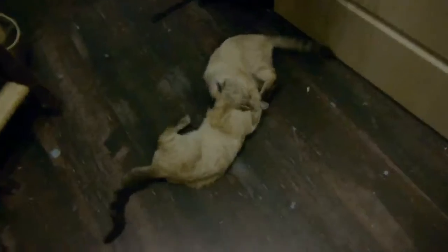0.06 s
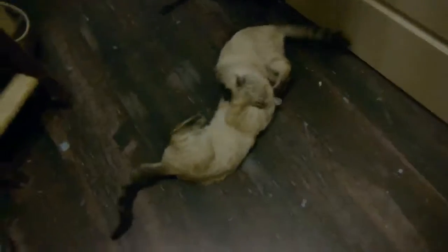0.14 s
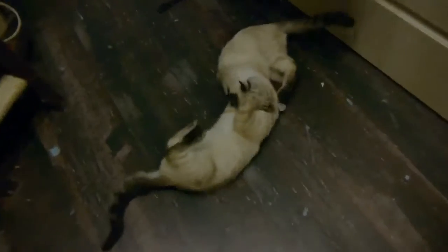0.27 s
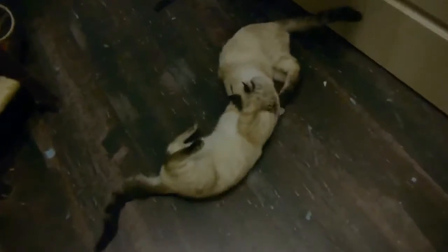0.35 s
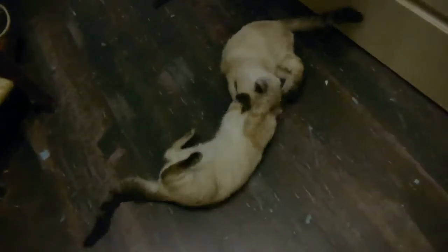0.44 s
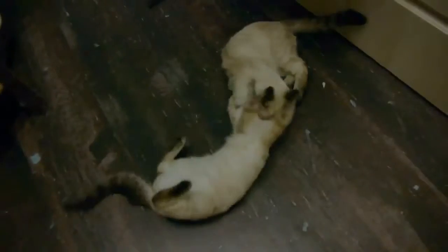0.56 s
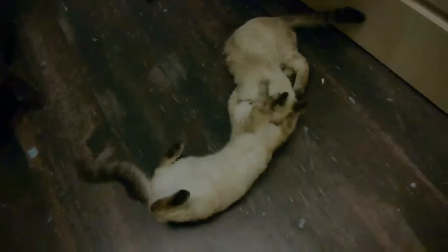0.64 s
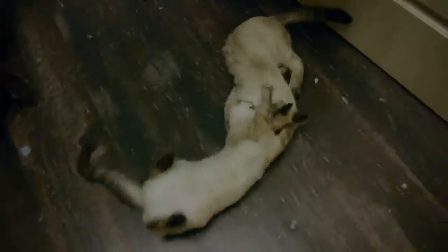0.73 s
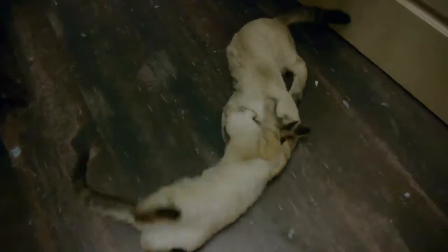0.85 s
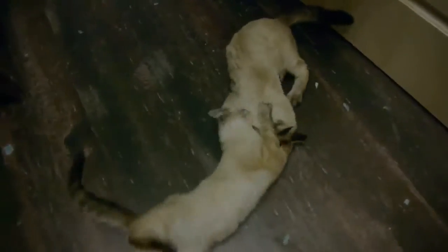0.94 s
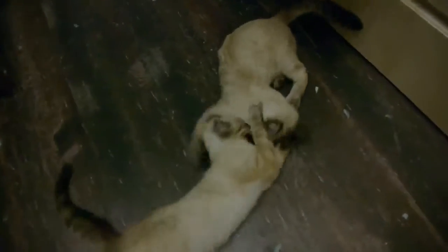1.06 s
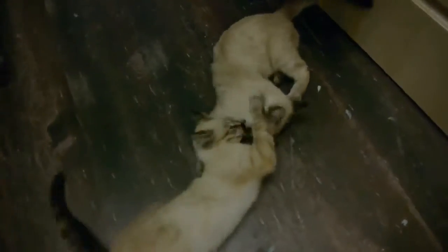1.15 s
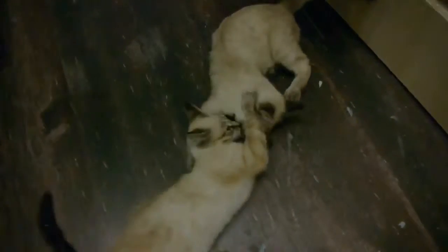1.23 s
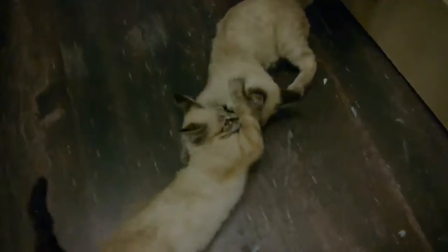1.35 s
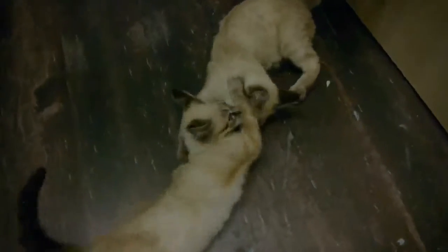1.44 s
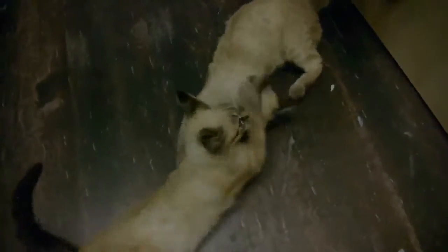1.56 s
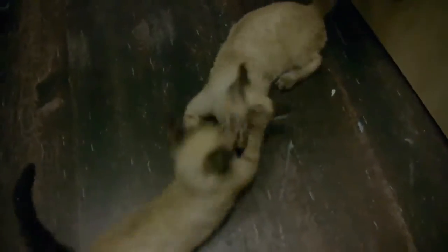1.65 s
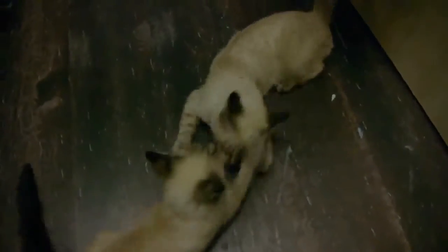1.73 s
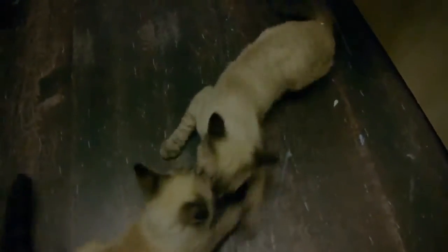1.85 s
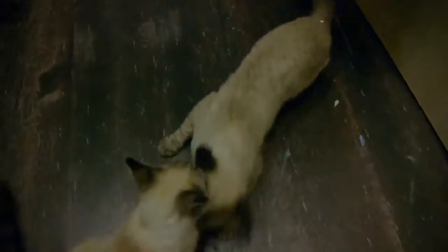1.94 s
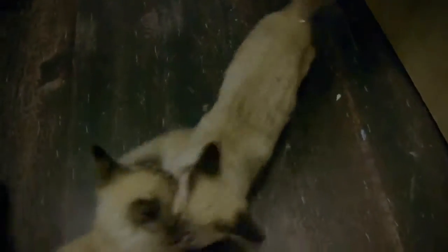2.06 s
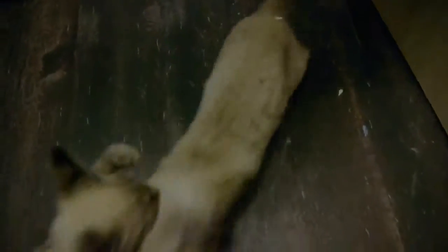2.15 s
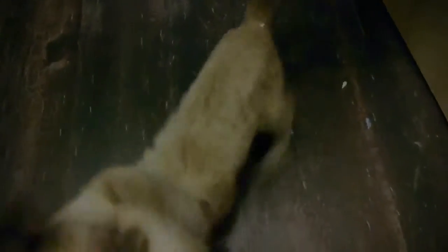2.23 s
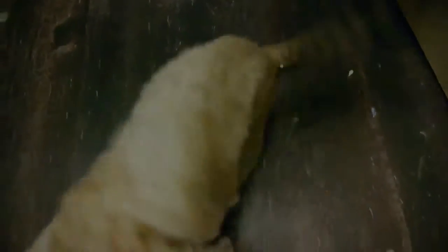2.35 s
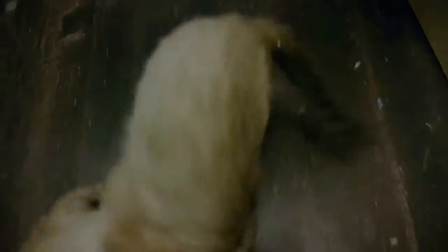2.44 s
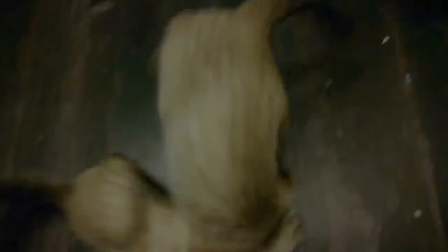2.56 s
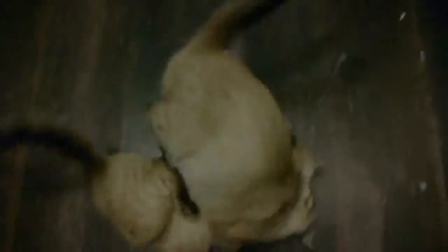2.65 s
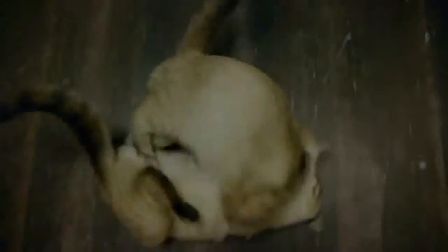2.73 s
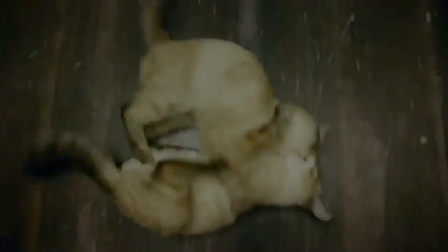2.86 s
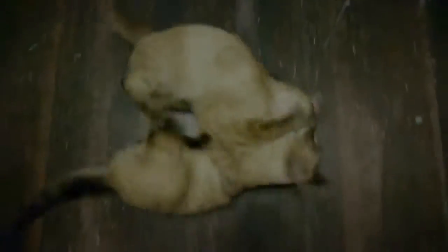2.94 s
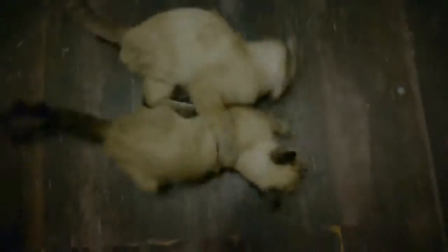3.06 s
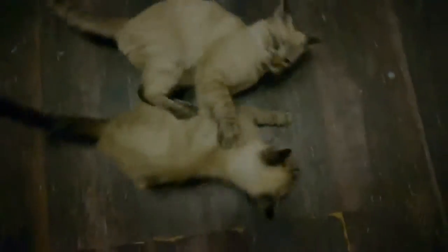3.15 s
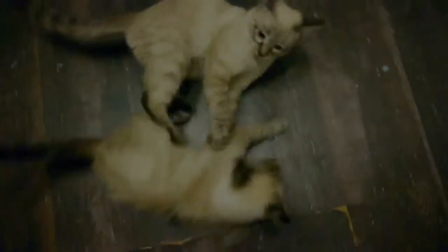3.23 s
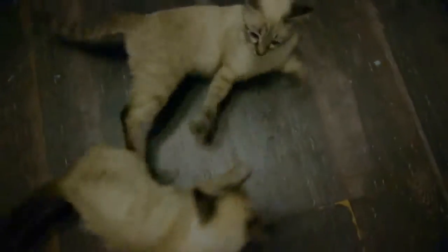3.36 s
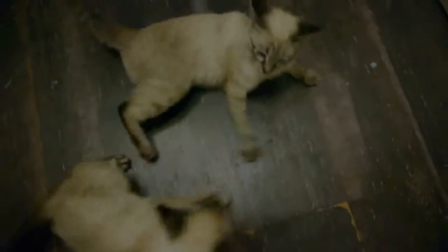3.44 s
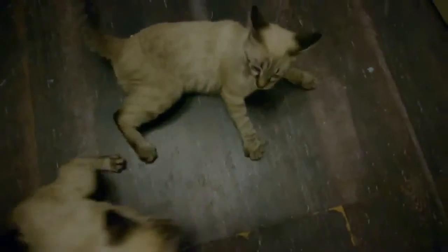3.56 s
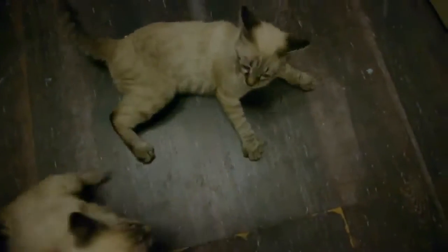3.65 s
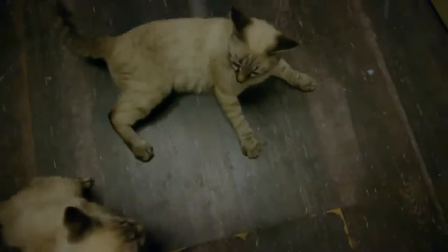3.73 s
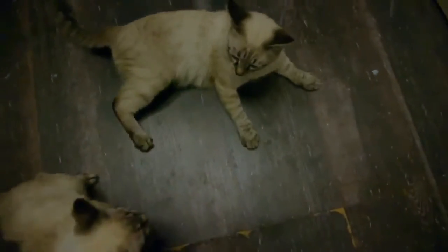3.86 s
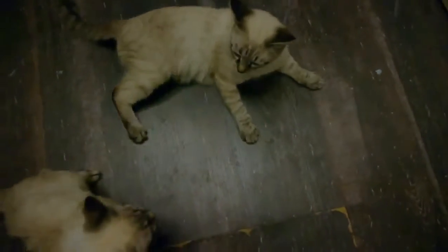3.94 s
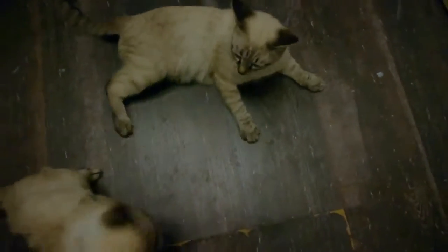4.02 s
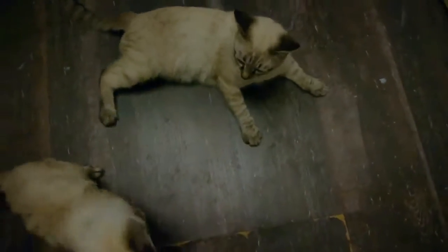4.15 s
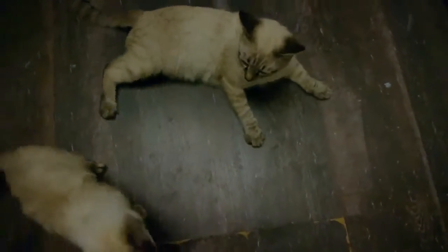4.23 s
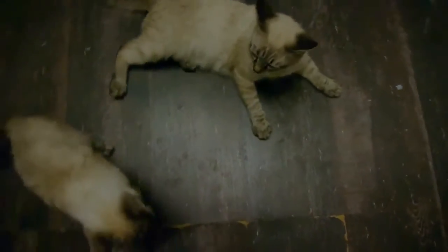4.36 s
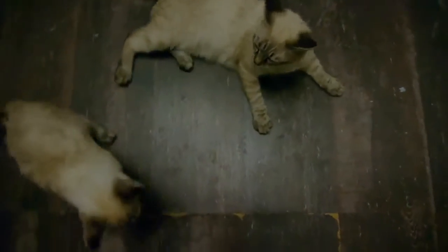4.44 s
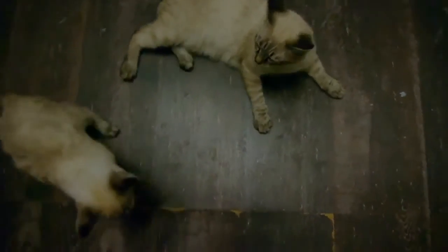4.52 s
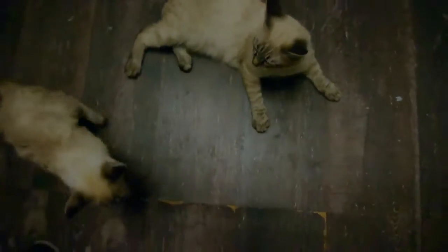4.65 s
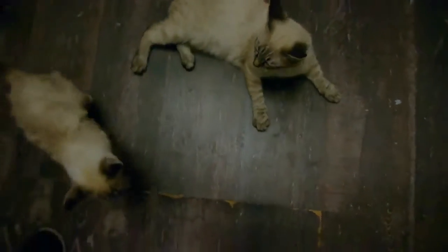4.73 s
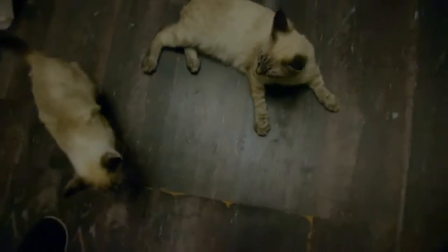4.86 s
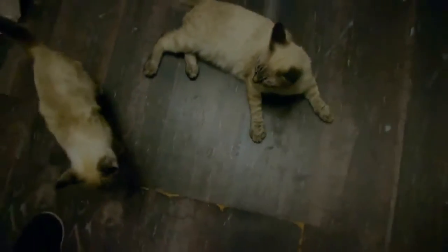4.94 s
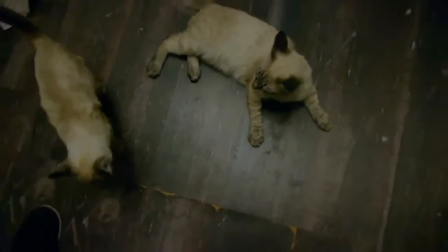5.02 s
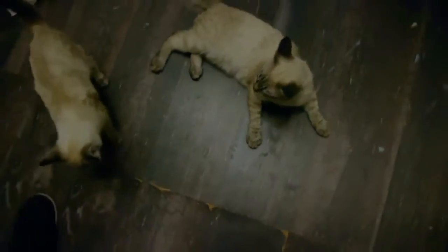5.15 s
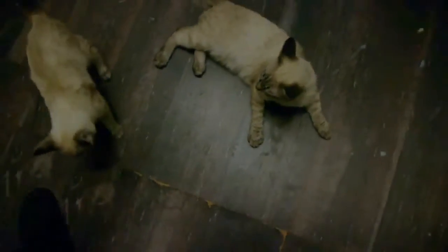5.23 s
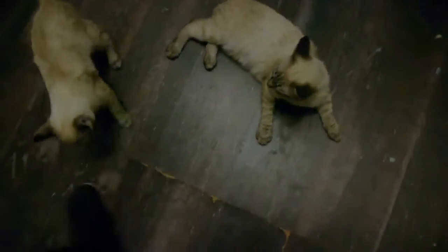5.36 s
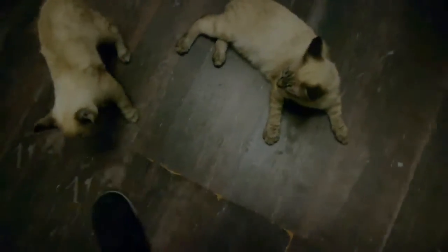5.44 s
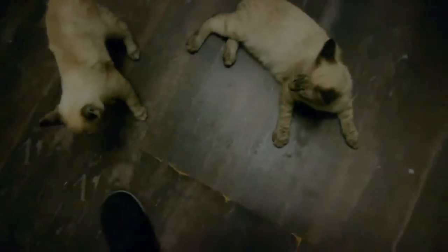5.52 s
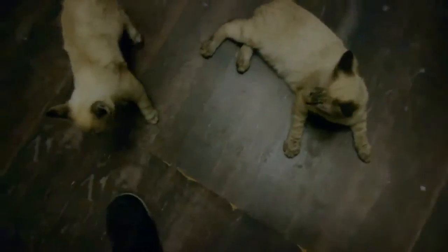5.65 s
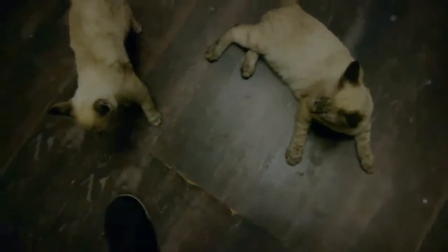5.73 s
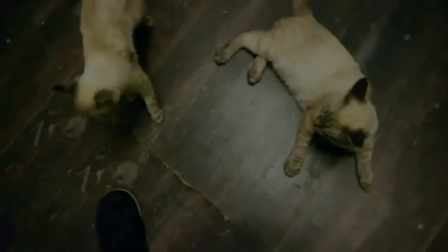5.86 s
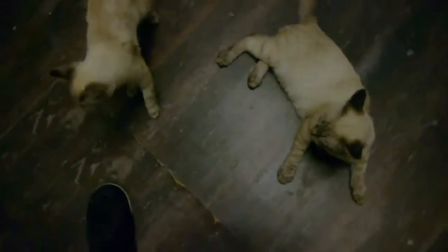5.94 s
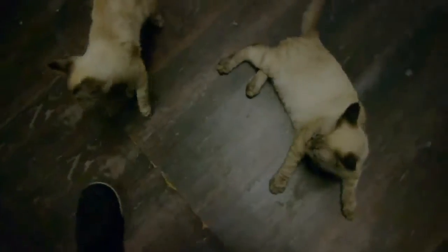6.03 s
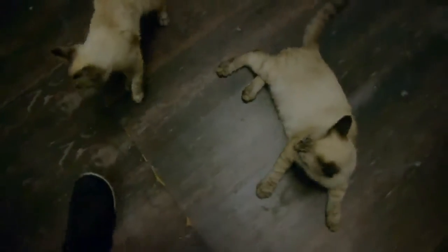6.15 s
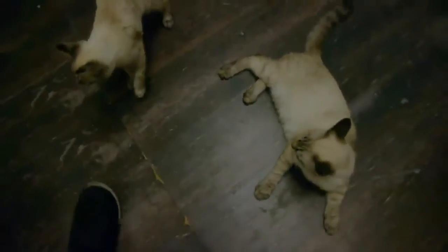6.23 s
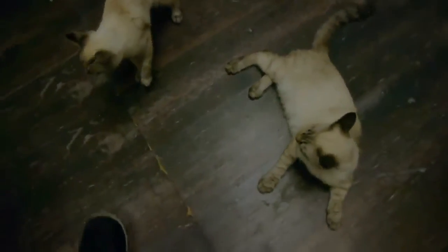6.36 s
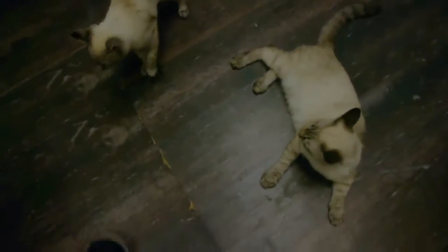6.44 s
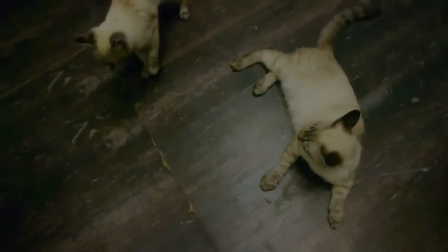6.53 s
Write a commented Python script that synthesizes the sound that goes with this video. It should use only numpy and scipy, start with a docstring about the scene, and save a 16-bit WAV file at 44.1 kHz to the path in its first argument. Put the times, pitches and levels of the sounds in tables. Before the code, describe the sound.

Two cats scuffle on a wooden floor: fur swishes, claws tick, bodies thump, one landing very loud, then a clunk and faint hum.

```python
"""Two cats wrestle on a wooden floor in a small room, heard from just above.
Fur: shaped noise in strokes that speed up and slow down. Bodies: soft pushes plus ringing floorboard modes.
Paw pats, claw ticks and the hard knock within some landings: short coloured pulses, smeared by skidding.
Dragging pads: brief swells of band noise. Midway an appliance, likely a fridge, clunks on; its relay snaps
and its motor hums in harmonics. Behind it all: quiet shaped-noise room tone."""
import sys
import numpy as np
from scipy import signal
from scipy.fft import rfft, irfft
from scipy.io import wavfile
from scipy.ndimage import uniform_filter1d

SR = 44100
rng = np.random.default_rng(int(sys.argv[2]) if len(sys.argv) > 2 else 0)


def log_audio(samples):
    """Write samples as a 16-bit WAV file to the path given in sys.argv[1]."""
    # one column per channel
    frames = np.atleast_2d(samples).T
    # limit to full scale, then quantise
    limited = np.clip(frames, -1, 1)
    pcm = np.round(limited * 32767).astype(np.int16)
    wavfile.write(sys.argv[1], SR, pcm)


N = 290619

# Room tone spectrum: (frequency [Hz], relative density [dB])
AIR_SPECTRUM = [(20, -28), (45, -10), (90, -4), (180, -1), (320, 0), (550, -5.5), (1000, -8.5), (1600, -15),
                (2700, -20), (4500, -20), (9000, -24), (15000, -27.5)]
# Room decay: (frequency [Hz], t60 [s])
ROOM_T60 = [(100, 0.15), (400, 0.41), (1000, 0.33), (4000, 0.32), (14000, 0.27)]
# Left-right likeness of noise: (frequency [Hz], correlation [-1 to 1])
LIKENESS = [(100, .99), (350, 1), (700, 0.89), (1400, 0.67), (3100, 0.12), (6800, 0.11), (10000, -0.12),
            (15000, -0.45)]
# Appliance knocks and relay snaps:
# (time [s], peak level [dB], hardness [dB/octave], room [dB re knock], cabinet boom [dB])
SWITCHES = [(3.5509, -19, -3.5, 4.5, -36), (3.5599, -29.5, 2, 6.5, -52), (4.1171, -30.5, 3, 1.5, -71),
            (4.1223, -31, 4, 5, -74)]
# Knock spectrum: (frequency [Hz], relative level [dB])
SWITCH_SPECTRUM = [(40, -36), (160, -14.5), (300, 0.5), (550, -8.5), (780, -9), (1050, -16), (1600, -14.5),
                   (2700, -18), (4200, -17.5), (8000, -32), (12000, -36), (15000, -46)]
# Motor hum course: (time [s], level [dB])
MOTOR_LEVEL = [(3.6, -54.5), (3.95, -48.5), (4.5, -53.5), (5.2, -55.5), (6.59, -58.5)]
# Hum harmonics: (multiple of HUM_HZ [1], relative level [dB])
HUM_HARMONICS = [(1, 0.5), (2, -13.5), (3, -8.5), (6, -15.5)]
# Pads sticking and slipping:
# (middle [s], peak level [dB], pitch [Hz], width [Hz], swell half-length to 1/e [s])
SQUEAKS = [(0.768, -41.5, 950, 200, 0.0056), (0.766, -44.5, 4480, 500, .005),
           (1.035, -31.5, 3420, 1730, 0.045), (1.046, -29.5, 3910, 320, 0.012),
           (1.72, -44, 3440, 1600, 0.018), (3.479, -39.5, 3400, 2000, 0.037),
           (6.034, -52.5, 1540, 400, 0.044), (6.521, -48.5, 1370, 180, 0.11)]
# Claw ticks: (time [s], peak level before claw_db [dB], left over right [dB])
CLAWS = [(0.067, -43, 2), (.164, -43, 6), (0.486, -41.5, 5), (0.764, -40, 1), (2.394, -46, 3),
         (2.4616, -35, -2), (3.7642, -50.5, -5), (4.797, -53, 0), (4.97, -54, -1), (5.87, -39.5, 3),
         (5.892, -41, 1), (6.128, -45.5, -6)]
# Tick spectrum: (frequency [Hz], relative level [dB])
CLAW_SPECTRUM = [(300, -24), (1500, -37), (3000, -9.5), (4200, -7), (5000, -3), (6500, -14), (10000, -18.5),
                 (15000, -22)]
# Paw pats and scuffs, and the hard knock within some body landings:
# (time [s], peak level [dB], hardness [dB/octave], room [dB re pulse])
PATS_AND_KNOCKS = [(0.766, -45, 10, -7), (0.974, -42.5, -10, 0), (1.7, -41, -2.5, 5),
                   (1.726, -39.5, -10.5, 11), (2.704, -30.5, -2.5, 6.5), (2.722, -17, -3.5, -8),
                   (2.9214, -23, -7.5, -6), (3.1849, -30.5, -3, 1), (3.8362, -46.5, 4.5, 7),
                   (3.881, -42, 0, 0.5), (3.985, -49.5, 9, -10), (4.532, -46.5, 0, -5),
                   (5.5602, -38.5, -3, -1.5), (6.2557, -38, 6, -14)]
# Pat and knock spectrum before hardness: (frequency [Hz], relative level [dB])
PAT_SPECTRUM = [(100, -22.5), (330, 5), (600, -8.5), (950, -8), (1800, -12.5), (3400, -11), (5000, -15),
                (8000, -31), (15000, -44)]
# Bodies landing: (time [s], peak level [dB], contact corner [Hz], room [dB re push])
THUMPS = [(.179, -40.5, 557, -8), (.925, -49.5, 600, -3), (1.2618, -17, 824, -3),
          (2.056, -19.5, 453, -11.5), (2.308, -37.5, 458, -11), (2.434, -42, 447, -1),
          (2.711, -17.5, 304, 2), (2.7219, -2.5, 860, -5.5), (2.9223, -18, 510, -3.5),
          (2.9466, -13, 586, -5), (3.165, -39.5, 450, -2), (3.187, -24, 810, -8), (3.414, -43, 714, 10),
          (5.557, -39, 800, 1), (5.631, -43, 800, 5.5), (5.801, -48, 554, 12)]
# Push spectrum before softening: (frequency [Hz], relative level [dB])
THUD_SPECTRUM = [(25, -28), (65, -25), (97, -8), (135, -18.5), (185, 4), (270, 4), (420, -2), (700, -7),
                 (1000, -13.5), (3000, -13)]
# Floorboard modes before softening: (frequency [Hz], relative level [dB], t60 [s])
BOARD_MODES = [(169, -13.5, 0.3), (200, -10, 0.3), (256, 2.5, 0.18), (306.4, -4.5, 0.25),
               (340.5, -0.5, .13), (368.6, -2.5, 0.19), (423, -8.5, .28), (452, -12, 0.34),
               (518.7, -9.5, 0.2), (590, -6.5, 0.17), (643, -25, 0.52), (700, -17.5, 0.32)]
# Flank or leg sweeping the boards; at 2.455 s the short hiss trailing a claw tick:
# (start [s], length [s], hiss at full speed [dB], share spent speeding up [0-1],
#  mean pressure [dB], left over right [dB])
STROKES = [(0, 0.054, -62, 0.14, 2.5, -1), (0.094, 0.078, -53, 0.31, -1.5, 1),
           (0.154, 0.22, -44, 0.41, -2, -1), (0.357, .25, -56, 0.067, -1, 0),
           (0.568, .22, -59, 0.41, -5.5, -.5), (.744, .1, -49.5, 0.33, -1.5, -0.5),
           (.836, 0.38, -61, 0.48, 2.5, 0), (0.968, 0.27, -36, 0.38, -4, -1.5),
           (1.034, 0.4, -41, 0.44, -6.5, -1.5), (1.697, 0.14, -59.5, 0.27, 4.5, -.5),
           (1.786, .25, -64.5, .59, 2.5, -1.5), (2.001, 0.36, -54.5, 0.28, 3.5, 0),
           (2.356, 0.11, -59, 0.55, -1.5, .5), (2.455, 0.043, -47.5, .14, -7, -0.5),
           (2.574, 0.077, -62, 0.1, -14, 2), (2.719, 0.56, -43.5, 0.41, -5, 1.5),
           (3.205, 0.42, -39.5, 0.72, -4.5, -2.5), (3.92, 0.063, -64.5, 0.59, 3, -1.5),
           (4.25, 0.11, -70, .4, -12, 0), (4.557, 0.93, -67.5, 0.59, 1, 0),
           (4.738, 0.11, -71.5, 0.41, 8.5, 0), (5.058, 0.33, -57, 0.57, -6.5, 2),
           (5.327, 0.15, -58.5, 0.45, -3, 1.5), (5.56, .17, -47, 0.17, -2.5, 1),
           (5.724, 0.13, -48.5, 0.62, -1.5, -0.5), (5.963, 0.13, -49, 0.56, -2.5, -2),
           (6.084, 0.24, -58.5, .22, 2, 1), (6.252, 0.58, -41.5, 0.42, -3, 1)]
# Rubbing spectrum: (frequency [Hz], relative density [dB])
FUR_SPECTRUM = [(88, -39), (150, -17), (328, -1), (406, -5.5), (566, -4.5), (689, -9), (854, -4), (923, -9),
                (1630, -4), (2500, -6.5), (3840, -3.5), (4320, -2), (12200, -9), (15100, -15), (16000, -35)]

AIR_DB, HUM_HZ, EDGE_HZ = -55, 99.8, 15900
RATTLE_S = 0.0051  # loose parts chatter, decay to 1/e
RING_DB, RING_FOLLOWS = -1, 0.19  # board ringing re push; extra dB per dB of room
SPEED_POWER = 0.9  # friction noise grows with speed to this power
PRESSURE_RISE_DB = 0.5  # start to end of a stroke
DULLING = 0.2  # fizz lost per dB of pressure: pressed fur lies flat
LINGER_S, LINGER_SHARE = 0.018, 0.45  # share of rubbing power held by the room
CATCHES_PER_S, CATCH_DB, CATCH_S = 35, -8.5, 0.0016  # hair snags: rate, surge re steady rub, decay
TIME_S = np.arange(N) / SR
BLOW_S = np.arange(SR // 2) / SR  # time since a blow
BLOW_HZ = abs(np.fft.fftfreq(len(BLOW_S), 1 / SR))


def amp(db):
    """Decibels to gain."""
    return 10 ** (np.asarray(db) / 20)


def evened(x):
    """Scales to rms 1."""
    return x / np.sqrt(np.mean(x ** 2) + 1e-20)


def read(points, hz):
    """Interpolates a table over log frequency."""
    f, value = np.transpose(points)
    return np.interp(np.log(hz + 1), np.log(f + 1), value)


def add(mix, start_s, sound):
    """Mixes a stereo sound in, cut at the end of the mix."""
    part = mix[:, round(start_s * SR):][:, :sound.shape[1]]
    part += sound[:, :part.shape[1]]


def panned(x, side_db):
    """Sets left over right level; positive leans left."""
    return x * amp(np.array([[.5], [-.5]]) * side_db)


def peaking(x, db):
    """Sets the rms level of the loudest 4 ms."""
    power = uniform_filter1d((x ** 2).mean(0), size=176)
    return amp(db) * x / np.sqrt(power.max())


def noise(size, spectrum=((1, 0), (2, 0))):
    """Coloured stereo noise, correlated across the channels by LIKENESS; rms 1."""
    hz = np.fft.rfftfreq(size, 1 / SR)
    same = np.clip(read(LIKENESS, hz), -.999, .999)
    mid, side = rfft(rng.standard_normal((2, size)))
    mid, side = mid * np.sqrt(1 + same), side * np.sqrt(1 - same)
    stereo = np.array([mid + side, mid - side])
    return evened(irfft(stereo * amp(read(spectrum, hz)), size))


def wander(rate_hz):
    """Low-passed random drift of rms 1."""
    hz = np.fft.rfftfreq(N, 1 / SR)
    return evened(irfft(rfft(rng.standard_normal(N)) * np.exp(-(hz / rate_hz) ** 2), N))


def band(x, low_hz, high_hz):
    """Keeps one band."""
    sos = signal.butter(4, [low_hz, high_hz], "band", fs=SR, output="sos")
    return signal.sosfilt(sos, x)


def split(x, corner_hz):
    """Parts below and above a corner."""
    low = irfft(rfft(x) / (1 + (np.fft.rfftfreq(N, 1 / SR) / corner_hz) ** 4), N)
    return low, x - low


def tilted(spectrum, hardness_db):
    """Harder contact lifts the treble, in dB per octave."""
    return read(spectrum, BLOW_HZ) + hardness_db * np.log2(1 + (BLOW_HZ / 450) ** 2) / 2


def softened(hz, corner_hz):
    """Level change in dB: a soft contact lasts too long to excite much above its corner."""
    return -10 * np.log10(1 + (hz / corner_hz) ** 8)


def blow(colour_db, room_db, skid_s=0, room_build_s=0.0011):
    """Minimum-phase pulse, smeared into tiny contacts if it skids, plus the room's decaying answer."""
    log_gain = np.log(amp(np.maximum(colour_db, -100)))
    pulse = np.fft.ifft(np.exp(np.conj(signal.hilbert(log_gain)))).real[None]
    size = len(BLOW_S)
    f, t, z = signal.stft(noise(size), SR, nperseg=256)
    decay = amp(-60 * t / read(ROOM_T60, f)[:, None])
    tail = signal.istft(z * decay, SR, nperseg=256)[1][:, :size]
    tail = tail * (1 - np.exp(-(BLOW_S / room_build_s) ** 2))
    tail = signal.fftconvolve(tail, pulse, axes=1)[:, :size]
    if skid_s:
        contacts = noise(size) * np.exp(-BLOW_S / skid_s)
        pulse = signal.fftconvolve(contacts, pulse, axes=1)[:, :size]
    return evened(pulse) + amp(room_db) * evened(tail)


def air():
    """Room tone: steady shaped noise with a slight level flicker."""
    return noise(N, AIR_SPECTRUM) * amp(AIR_DB + .5 * wander(24))


def motor(waver_db=1.3):
    """Harmonics of HUM_HZ, each wavering alone, from the first knock on."""
    hum = np.zeros(N)
    for multiple, db in HUM_HARMONICS:
        turns = round(multiple) * HUM_HZ * TIME_S + rng.random()
        hum += amp(db + waver_db * wander(4)) * np.sin(2 * np.pi * turns)
    running = np.clip((TIME_S - SWITCHES[0][0]) / .05, 0, 1)  # 50 ms fade-in
    return running * hum * amp(np.interp(TIME_S, *np.transpose(MOTOR_LEVEL)))


def appliance(boom_t60_s=0.53):
    """Each knock rattles and shakes the cabinet into a decaying low boom; the motor hums."""
    out = np.zeros((2, N))
    for start_s, db, hardness_db, room_db, boom_db in SWITCHES:
        knock = blow(tilted(SWITCH_SPECTRUM, hardness_db), room_db, RATTLE_S)
        add(out, start_s, peaking(knock, db))
        boom = evened(band(noise(len(BLOW_S)), 41, 160))
        add(out, start_s, boom * amp(boom_db - 60 * BLOW_S / boom_t60_s))
    return out + motor()


def squeaks(side_db=-3):
    """A pad sticks and slips as it drags: a resonant band of noise swells and fades."""
    out = np.zeros((2, N))
    size, middle_s = len(BLOW_S), BLOW_S[-1] / 2
    hz = np.fft.rfftfreq(size, 1 / SR)
    for s, db, pitch_hz, width_hz, length_s in SQUEAKS:
        resonance = 1 / (1 + (2 * (hz - pitch_hz) / width_hz) ** 2)
        tone = irfft(rfft(noise(size)) * resonance, size)
        swell = np.exp(-((BLOW_S - middle_s) / length_s) ** 2)
        add(out, s - middle_s, panned(peaking(tone * swell, db), side_db))
    return out


def claws(claw_db=-2, room_db=-6):
    """Claw tips skid for an instant on the wood and tick."""
    out = np.zeros((2, N))
    for start_s, db, side_db in CLAWS:
        tick = blow(read(CLAW_SPECTRUM, BLOW_HZ), room_db, skid_s=.0025)
        add(out, start_s, panned(peaking(tick, db + claw_db), side_db))
    return out


def pats_and_knocks():
    """Paw pats and scuffs, and the hard knock within some body landings; hardness tilts, a skid smears."""
    out = np.zeros((2, N))
    for start_s, db, hardness_db, room_db in PATS_AND_KNOCKS:
        contact = blow(tilted(PAT_SPECTRUM, hardness_db), room_db, skid_s=.0035)
        add(out, start_s, peaking(contact, db))
    return out


def board_ringing(corner_hz, build_s=0.0094):
    """Decaying floorboard modes, building up over some milliseconds; rms 1."""
    ring = np.zeros(len(BLOW_S))
    for hz, mode_db, t60_s in BOARD_MODES:
        level_db = mode_db + softened(hz, corner_hz) - 60 * BLOW_S / t60_s
        ring += amp(level_db) * np.sin(2 * np.pi * (hz * BLOW_S + rng.random()))
    return evened(ring * (1 - np.exp(-(BLOW_S / build_s) ** 2)))


def leading(x, lead_s):
    """Left channel earlier than right by lead_s."""
    hz = np.fft.rfftfreq(N, 1 / SR)
    return irfft(rfft(x) * np.exp(1j * np.pi * hz * lead_s * np.array([[1], [-1]])), N)


def thumps(heft=0.74, heavy_db=-11, side_db=-0.1, lead_s=.00003):
    """A soft body pushes the floor once; the boards take up the blow and ring on."""
    out = np.zeros((2, N))
    for start_s, db, corner_hz, room_db in THUMPS:
        # heavy landings bend the joists too: more bass below about 85 Hz
        joists_db = np.clip(heft * (db - heavy_db), -6, 6) / (1 + (BLOW_HZ / 85) ** 4)
        colour_db = read(THUD_SPECTRUM, BLOW_HZ) + joists_db + softened(BLOW_HZ, corner_hz)
        push = blow(colour_db, room_db, room_build_s=0.0019)
        ring = amp(RING_DB + RING_FOLLOWS * room_db) * board_ringing(corner_hz)
        add(out, start_s, peaking(push + ring, db))
    return leading(panned(out, side_db), lead_s)


def combed(x, echo=0.13, longest_s=.009):
    """Six early echoes from floor and walls per channel ripple the spectrum."""
    hz = np.fft.rfftfreq(N, 1 / SR)
    delays_s = rng.uniform(0.000958, longest_s, (6, 2, 1))
    return irfft(rfft(x) * (1 + echo * np.exp(-2j * np.pi * hz * delays_s).sum(0)), N)


def catches():
    """Hairs snag on the grain: brief decaying friction surges at random moments."""
    strength = np.minimum(rng.exponential(1, N), 3)
    snags = (rng.random(N) < CATCHES_PER_S / SR) * strength
    surges = signal.lfilter([1], [1, -np.exp(-1 / (CATCH_S * SR))], snags)
    return 1 + amp(CATCH_DB) * surges


def sweep(length_s, crest):
    """Progress 0-1 and speed of a stroke: one arch, topping at the crest."""
    progress = np.arange(0, length_s, 1 / SR) / length_s
    skew = np.log(.5) / np.log(crest)
    return progress, abs(np.sin(np.pi * progress ** skew))


def lingering(power):
    """Power to gain; part of the power dies away softly in the room."""
    keep = np.exp(-1 / (LINGER_S * SR))
    held = signal.lfilter([1 - keep], [1, -keep], power + 1e-20)
    return np.sqrt((1 - LINGER_SHARE) * power + LINGER_SHARE * held)


def stroke_gain(layer_follows):
    """Gain over all strokes: speed drives friction; pressure acts by layer_follows (dB per dB)."""
    power = np.zeros((2, N))
    for start_s, length_s, db, crest, press_db, side_db in STROKES:
        progress, speed = sweep(length_s, crest)
        pressure_db = press_db + PRESSURE_RISE_DB * (progress - .5)
        gain = amp(db + layer_follows * pressure_db) * speed ** SPEED_POWER
        add(power, start_s, panned(gain, side_db) ** 2)
    return lingering(power)


def fur(scrape_db=0, hiss_db=0, fizz_db=-1, judder_db=1.26):
    """Countless hairs catch and slip; pressure brings out the scrape of the wood and dulls the fizz."""
    rub = combed(noise(N, FUR_SPECTRUM)) * amp(judder_db * wander(18)) * catches()
    scrape, treble = split(rub, corner_hz=4240)
    mono = rub.mean(0)
    scrape = scrape / band(mono, 1200, 4200).std()
    treble = treble / band(mono, 4500, 14000).std()
    hiss, fizz = split(treble, corner_hz=8500)
    return (amp(scrape_db) * scrape * stroke_gain(1)
            + amp(hiss_db) * hiss * stroke_gain(0)
            + amp(fizz_db) * fizz * stroke_gain(-DULLING))


def scene():
    """Quiet room, appliance and cats."""
    return air() + appliance() + squeaks() + claws() + pats_and_knocks() + thumps() + fur()


def record(dry):
    """Clips at full scale, then low-passes at EDGE_HZ."""
    edge = signal.firwin(511, EDGE_HZ, window=("kaiser", 9), fs=SR)
    return signal.oaconvolve(np.clip(dry, -1, 1), edge[None], "same")


dry = scene()
out = record(dry)
log_audio(out)
```